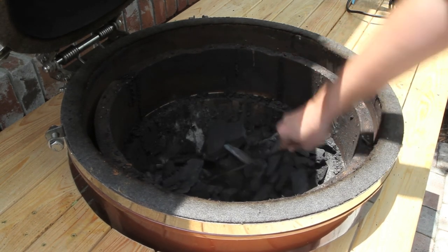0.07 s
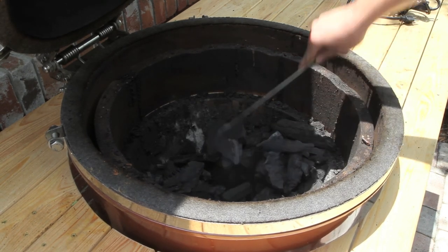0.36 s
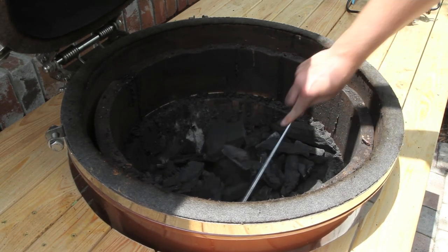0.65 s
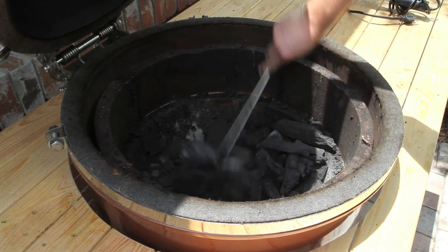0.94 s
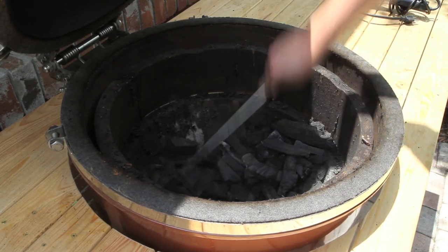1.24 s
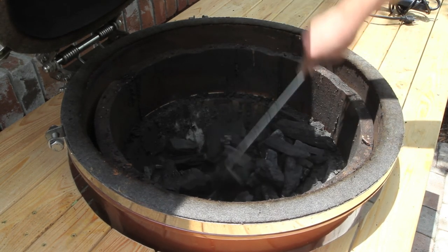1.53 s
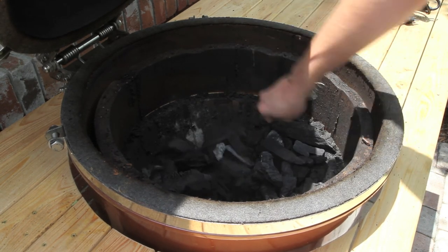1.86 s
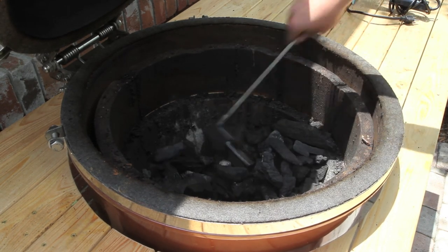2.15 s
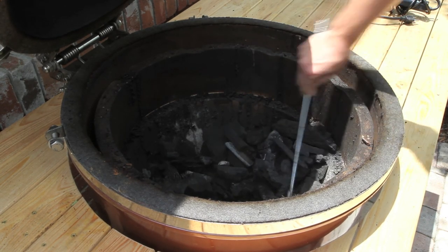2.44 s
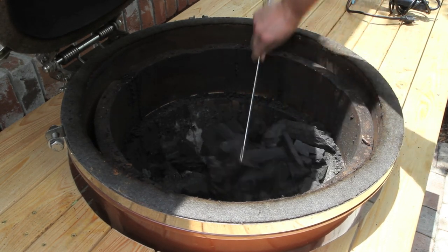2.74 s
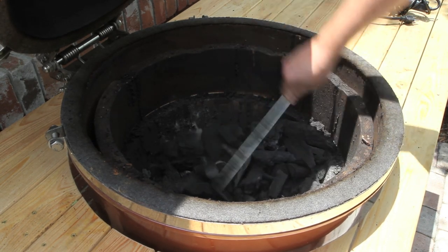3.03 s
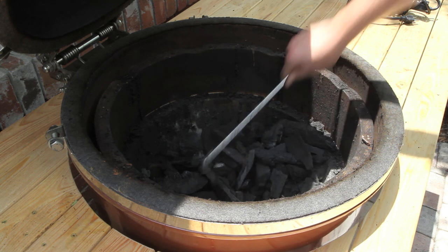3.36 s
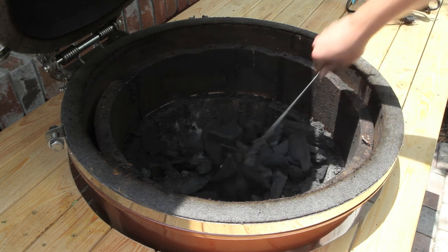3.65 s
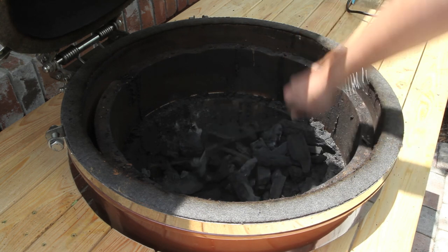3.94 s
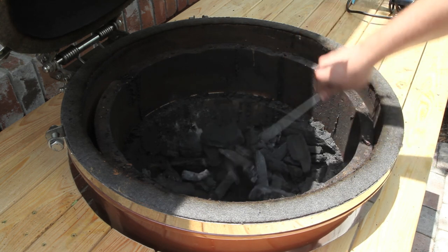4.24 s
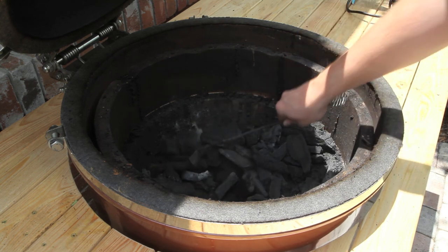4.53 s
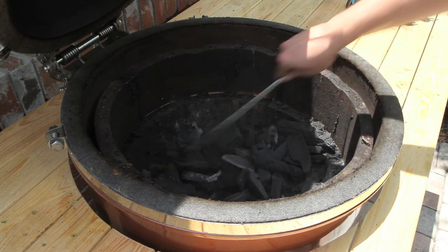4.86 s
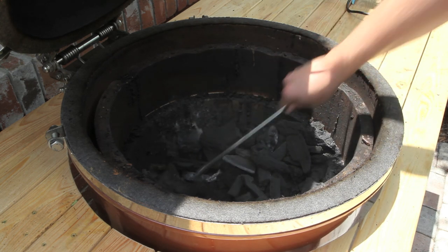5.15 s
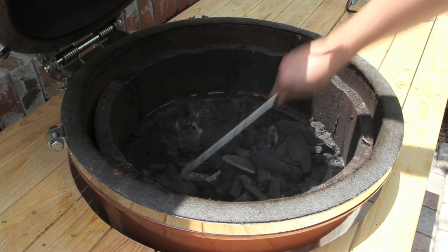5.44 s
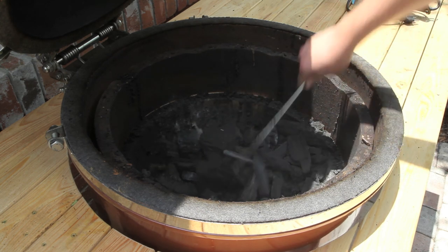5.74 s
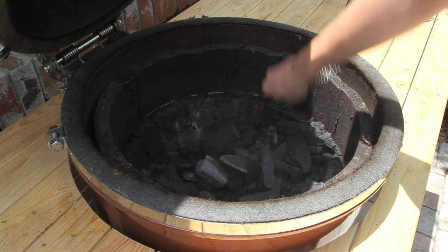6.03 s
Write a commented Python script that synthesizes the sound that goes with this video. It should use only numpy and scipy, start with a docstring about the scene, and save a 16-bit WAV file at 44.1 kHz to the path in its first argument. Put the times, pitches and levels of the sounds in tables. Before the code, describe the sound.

From the first instant a steel rake pushes through lump charcoal in an open ceramic grill, heard close in quiet outdoor air. Short, uneven strokes continue for about six seconds, each a rush of scraping grit with brittle lumps cracking, clinking and tumbling. The rake rings faintly and the hollow bowl booms softly underneath. At 0.6 seconds a cluster of heavier knocks hits the grate and leads into a longer scrape; more knocks come around 0.9, 1.8 and 2.4 seconds. Near 2.8 seconds one dense lump chatters against the blade with quick, bright ticks. The pushes and clinks go on with brief lulls. Around 4.8 seconds a soft, deep outdoor rumble swells, then fades beneath the last strokes. Two loud clacks stand out at about 5.5 and 6 seconds, followed by a final gritty scrape and a few clinks.

```python
"""A steel ash rake is pushed back and forth through lump charcoal in an open ceramic grill, outdoors.
From the first push the blade scrapes up a rush of grit, brittle lumps clink and tumble, the rake rings
faintly and the hollow bowl booms under it all. From 0.6 s on, a lump now and then knocks on the grate.
Near 2.8 s one dense lump chatters against the blade. Near 4.8 s a deep outdoor rumble swells, then
fades under the last pushes and two loud clacks."""
import sys
import numpy as np
from scipy import signal
from scipy.fft import rfft, irfft, next_fast_len
from scipy.io import wavfile
from scipy.ndimage import uniform_filter1d

SR = 44100
rng = np.random.default_rng(int(sys.argv[2]) if len(sys.argv) > 2 else 0)


def store_pcm(level_fs):
    """Save levels as 16-bit WAV."""
    pcm = np.round(np.clip(level_fs, -1, 1) * 32767).astype(np.int16)
    wavfile.write(sys.argv[1], SR, np.atleast_2d(pcm).T)


N = 277590
HIT_SAMPLES = 8192
AGE = np.arange(HIT_SAMPLES) / SR   # seconds since a hit


def from_db(db):
    """Turn decibels into a number to multiply by."""
    return 10 ** (np.asarray(db) / 20)


def unit_power(x):
    """Scale a sound to an average power of one."""
    return x / np.sqrt(np.mean(x ** 2) + 1e-20)


def unit_attack(x, attack_s=0.008):
    """Scale a hit so that its first moment has a power of one."""
    return x / np.sqrt(np.mean(x[:int(attack_s * SR)] ** 2) + 1e-20)


def steady(x, span_s):
    """Even out slow changes in loudness but keep the fine grain."""
    power = uniform_filter1d(x ** 2, max(int(span_s * SR), 2))
    return x / np.sqrt(np.maximum(power, 0) + 1e-12)


def add(track, start_s, sound):
    """Mix a sound into a track at the given time."""
    i = int(np.clip(start_s * SR, 0, N - 1))
    track[i:i + len(sound)] += sound[:N - i]


def fade(fade_s, size=HIT_SAMPLES):
    """Die away. Every fade time in this file is the time taken to drop by 60 dB."""
    return np.exp(-np.log(1000) * AGE[:size] / fade_s)


def noise(colour, size=HIT_SAMPLES):
    """A hiss whose colour says how strong each pitch is next to the others."""
    pitch_hz, level_db = np.transpose(colour)
    padded = next_fast_len(size, real=True)
    freq = np.maximum(np.fft.rfftfreq(padded, 1 / SR), 1)
    gain = from_db(np.interp(np.log(freq), np.log(pitch_hz), level_db))
    return unit_power(irfft(rfft(rng.standard_normal(padded)) * gain, padded)[:size])


def wander(turns_per_s):
    """A line that drifts up and down by chance, mostly between -1 and 1."""
    points = rng.standard_normal(N // 20)
    return np.interp(np.arange(N) / SR * turns_per_s, np.arange(len(points)), points)


def ring(force, notes):
    """An object that is hit or shaken rings at its own notes, each dying away."""
    out = 0
    for k, (pitch_hz, level_db, fade_s) in enumerate(notes):
        decay = np.exp(-np.log(1000) / (fade_s * SR))
        turn = 2 * np.pi * pitch_hz / SR
        note = signal.lfilter([0, np.sin(turn)], [1, -2 * decay * np.cos(turn), decay ** 2], force + 1e-18)
        out = out + (-1) ** k * from_db(level_db) * note
    return out


# colours of the open air and of its rumble: pitch_hz, level_db
AIR_COLOUR = [(70, -34), (130, 10.5), (250, -4), (1500, -9.5), (4000, -31)]
RUMBLE_COLOUR = [(25, -10), (60, -6), (160, -3), (400, -46)]
# how loud the rumble is as time passes: time_s, level_db
RUMBLE_LOUDNESS = [(0.7, -57), (1.3, -66), (4.3, -66), (4.8, -47.5), (5.4, -50), (6.29, -68)]


def outdoors(air_db=-47.5):
    """Quiet air and a deep rumble that comes and goes."""
    rumble_db = np.interp(np.arange(N) / SR, *np.transpose(RUMBLE_LOUDNESS))
    return from_db(air_db) * noise(AIR_COLOUR, N) + from_db(rumble_db) * noise(RUMBLE_COLOUR, N)


# low notes of the air in the bowl: pitch_hz, level_db, fade_s
BOWL_NOTES = [(132.4, 0, 0.18), (152.3, 2.5, 0.18), (231.3, -6, 0.12), (332.5, -7, 0.079)]


def bowl_boom(boom_db):
    """The shifting coals keep the air in the bowl booming."""
    return from_db(boom_db) * steady(ring(rng.standard_normal(N), BOWL_NOTES), span_s=0.095)


# high notes of the steel rake: pitch_hz, level_db, fade_s
RAKE_NOTES = [(1590, -8, 0.15), (2720, 8.5, 0.06), (4380, -9, 0.22), (5800, 7, 0.07), (6100, 2, 0.24),
              (6610, -17, 0.19), (13300, -3, 0.063)]


def rake_ring(coals, push_db, below_coals_db=22.0, muting=0.15):
    """The steel rings from all that touches it, and is muted while pushed hard into the coals."""
    pressing_db = np.maximum(push_db - np.percentile(push_db, 30), 0)
    ringing = from_db(-muting * pressing_db) * ring(coals, RAKE_NOTES)
    return from_db(-below_coals_db) * np.std(coals) * unit_power(ringing)


def lump_ring(pitch_hz, fade_s, size, overtone_db=-10.0, spread=0.5):
    """An uneven lump rings at one main note and four chance ones; higher notes die sooner."""
    ratios = np.append(1, np.exp(spread * rng.uniform(-0.272, 1, size=4)))
    gains = np.append(1, from_db(overtone_db) * rng.standard_normal(size=4))
    pitches = np.minimum(pitch_hz * ratios, SR / 2)[:, None]
    decays = fade(fade_s / np.sqrt(ratios[:, None]), size)
    return gains @ (np.sin(2 * np.pi * pitches * AGE[:size]) * decays)


def snap(colour, fade_s, echo_db, echo_s, rise_s=0.00084):
    """A snap builds as it bounces through the heap, then echoes between the ceramic walls."""
    rise = 1 - np.exp(-AGE / rise_s)
    return unit_attack(noise(colour) * rise * (fade(fade_s) + from_db(echo_db) * fade(echo_s)))


# colours of a lump's clack and of its brittle skin cracking: pitch_hz, level_db
CLACK_COLOUR = [(100, -26), (400, -1), (1300, 5.5), (3500, 1), (6000, -1), (9000, -13), (16000, -3.5)]
CRACK_COLOUR = [(1500, -20.5), (5000, 1), (10000, -0.5), (13300, 5.5), (16000, 1)]


def lump_hit(ring_db, pitch_hz, crack_db, snap_s, ring_s, tone_db, focus_db, tilt_db, overtone_db, spread):
    """One hit: a clack boosted near the lump's pitch, the lump's own ring, and the crack of its skin."""
    freq = np.geomspace(100, 16000, num=40)
    clack_hz, clack_db = np.transpose(CLACK_COLOUR)
    octaves = np.log2(freq / pitch_hz)
    colour_db = np.interp(np.log(freq), np.log(clack_hz), clack_db)
    colour_db += focus_db * np.exp(-(octaves / 0.7) ** 2)
    colour_db += tilt_db * np.maximum(octaves, 0)
    clack = snap(np.c_[freq, colour_db], snap_s, echo_db=-5.5, echo_s=0.087)
    deadened_db = 0.25 * max(crack_db + 38, 0)   # a lump that cracks louder than -38 dB rings less
    tone = unit_attack(lump_ring(pitch_hz, ring_s, HIT_SAMPLES, overtone_db, spread))
    body = unit_attack(clack + from_db(tone_db - deadened_db) * tone)
    crack = snap(CRACK_COLOUR, snap_s, echo_db=-15.0, echo_s=0.16)
    return from_db(ring_db) * body + from_db(crack_db) * crack


def tumble(level_db, centre_hz, fade_s, count, vary_db=4.0, spread=0.3, tick_db=-8):
    """Loose pieces roll off the blade; each lands with a dry tick and a short ring at its own pitch."""
    out = np.zeros(N)
    tick = from_db(tick_db) * unit_attack(noise(CLACK_COLOUR, size=2048) * fade(0.02, size=2048))
    landings = rng.random(count) * N
    sizes, pitches = np.clip(rng.standard_normal((2, count)), -2, 2)
    for landing, size, pitch in zip(landings, sizes, pitches):
        tone = unit_attack(lump_ring(centre_hz * np.exp(spread * pitch), fade_s, size=2048))
        add(out, landing / SR, from_db(level_db[int(landing)] + vary_db * size) * (tone + tick))
    return out


# one dense lump bouncing against the blade: start_s, level_db
CHATTER_TOUCHES = [(2.73, -26.5), (2.782, -25), (2.803, -42), (2.828, -26), (2.836, -21.5), (2.915, -31)]
# the notes of that lump: pitch_hz, level_db, fade_s
DENSE_LUMP_NOTES = [(4420, 1, .06), (5615, 3, 0.062), (6615, -7, 0.11)]


def chatter():
    """Each touch ticks and rings the same few notes of the dense lump, in a new balance."""
    out = np.zeros(N)
    for start_s, level_db in CHATTER_TOUCHES:
        notes = [(hz, db + 3 * rng.standard_normal(), fade_s) for hz, db, fade_s in DENSE_LUMP_NOTES]
        tone = unit_attack(ring(signal.unit_impulse(HIT_SAMPLES), notes))
        tick = from_db(-0.5) * unit_attack(noise(GRIT_COLOUR) * fade(0.046))
        add(out, start_s, from_db(level_db) * (tone + tick))
    return out


def crunch(length_s):
    """The skin of a lump gives way in a quick, growing burst of grit."""
    growth = np.linspace(0, 1, int(length_s * SR)) ** 2
    return from_db(2) * growth * noise(GRIT_COLOUR, size=len(growth))


# light hits of lump on lump or blade: start_s, ring_db, pitch_hz, crack_db
LIGHT_HITS = [(0.057, -19.5, 5920, -26), (0.365, -22, 4420, -23), (0.399, -24, 4020, -22),
              (0.564, -27, 3730, -20), (0.944, -16, 4340, -21), (0.984, -17.5, 4290, -17),
              (1.156, -27.5, 2790, -40), (1.229, -17, 5550, -12.5), (1.248, -19.5, 5130, -22),
              (1.327, -19.5, 4140, -18), (1.384, -27, 4630, -13), (1.724, -21.5, 5480, -13.5),
              (1.758, -28, 1400, -15), (1.819, -20, 2760, -11), (2.158, -23, 2750, -40),
              (2.261, -32, 5725, -23), (2.336, -28, 3040, -27.5), (2.864, -23.5, 5880, -16.5),
              (2.885, -17, 2920, -21), (2.994, -20.5, 4880, -16.5), (3.031, -18, 4720, -16),
              (3.1, -15, 3910, -23), (3.112, -16, 3140, -26), (3.398, -20.5, 6040, -10.5),
              (3.524, -32, 4460, -17), (3.584, -22, 3200, -19.5), (3.629, -16, 3400, -16.5),
              (3.835, -23, 4140, -26.5), (3.852, -24.5, 4010, -34), (3.905, -32, 6900, -20),
              (4.016, -20, 2630, -11), (4.1, -26, 7960, -26), (4.124, -22, 3430, -16.5),
              (4.227, -31.5, 3720, -34), (4.335, -29, 3770, -27), (4.457, -17, 2827, -20),
              (4.584, -12.5, 4300, -25), (4.614, -22.5, 3380, -21), (4.655, -20, 3870, -17),
              (4.767, -24.5, 3030, -24), (4.872, -28, 4900, -24), (4.903, -25.5, 3800, -25),
              (4.966, -25.5, 4830, -23.5), (5.087, -19.5, 5030, -16), (5.157, -25, 2590, -27),
              (5.2, -27, 1590, -34), (5.312, -32, 3340, -27), (5.664, -16.5, 5380, -16),
              (5.795, -26.5, 1570, -25), (5.961, -28, 4950, -24), (6.108, -19, 2810, -19),
              (6.128, -17, 4300, -27), (6.15, -15, 2720, -27)]


def clinks(grit_db, crunch_s=0.012):
    """Lumps strike each other and the blade; those being pushed crumble just before they crack."""
    out = np.zeros(N)
    for start_s, ring_db, pitch_hz, crack_db in LIGHT_HITS:
        crumble_s = start_s - crunch_s
        add(out, crumble_s, from_db(grit_db[max(int(crumble_s * SR), 0)]) * crunch(crunch_s))
        clink = lump_hit(ring_db, pitch_hz, crack_db, snap_s=0.023, ring_s=0.043, tone_db=3.0,
                         focus_db=10.0, tilt_db=1.5, overtone_db=-7, spread=1.0)
        add(out, start_s, clink)
    return out


# heavy hits that reach the grate: start_s, ring_db, pitch_hz, crack_db, thud_db
HEAVY_HITS = [(0.604, -12.5, 1567, -38, -24), (0.613, -15, 2140, -38, -19.5), (0.638, -18, 1430, -17, -34),
              (0.674, -21.5, 1475, -32, -55), (0.921, -15.5, 1400, -12.5, -29.5),
              (1.741, -18, 3920, -16, -54), (1.837, -18, 1335, -15.5, -44), (2.382, -14.5, 2266, -30, -19),
              (2.392, -18, 1875, -17, -23.5), (2.994, -22, 1020, -40, -38), (3.008, -26, 1130, -32, -42),
              (3.049, -23.5, 1290, -40, -50), (3.918, -27, 5100, -15, -31), (4.437, -20, 5280, -20.5, -29),
              (5.063, -20.5, 3880, -17, -38), (5.077, -20.5, 950, -23, -38), (5.11, -27, 5200, -19, -33),
              (5.504, -24.5, 2500, -27, -34), (5.516, -11, 3000, -18.5, -23.5),
              (5.983, -8, 1508, -14.5, -42), (6.176, -20, 1620, -41, -46)]
# notes of the grate and fire box: pitch_hz, level_db, fade_s
GRATE_NOTES = [(231.5, -0.5, 0.078), (329.5, 3, 0.086), (490, 2, 0.047)]


def knocks():
    """Heavy hits clack with a bunch of close notes and set the grate and fire box thudding."""
    out = np.zeros(N)
    for start_s, ring_db, pitch_hz, crack_db, thud_db in HEAVY_HITS:
        clack = lump_hit(ring_db, pitch_hz, crack_db, snap_s=0.034, ring_s=0.068, tone_db=0.5,
                         focus_db=3.0, tilt_db=-1.0, overtone_db=-0.5, spread=0.35)
        blow = fade(0.0045)
        rattle = 0.066 * rng.standard_normal(HIT_SAMPLES) * fade(0.053)
        thud = from_db(thud_db) * unit_attack(ring(blow + rattle, GRATE_NOTES))
        add(out, start_s, clack + thud)
    return out


def tiny_breaks(colour, per_s, vary_db, snap_s, catch_db, places=5):
    """Countless tiny breaks, louder and softer as the blade catches and slips."""
    breaking = rng.random(N) < per_s / SR
    level_db = vary_db * np.minimum(rng.exponential(1, N), 4) + catch_db * wander(110)
    cracks = breaking * from_db(level_db) * rng.choice([-1, 1], N)
    place = rng.integers(0, places, N)
    out = np.zeros(N)
    for k in range(places):   # each place in the bowl echoes in its own way
        sound = snap(colour, snap_s, echo_db=-17.5, echo_s=0.075)
        out += signal.oaconvolve(cracks * (place == k), sound)[:N]
    return steady(out, span_s=0.1)


# colours of sliding grit and of lumps grinding together: pitch_hz, level_db
GRIT_COLOUR = [(900, -11), (2000, -10), (3000, -1.5), (5400, -2), (7500, -5), (10000, -6.5), (13500, 1.5),
               (16000, -8)]
GRIND_COLOUR = [(80, -53), (170, -7.5), (350, -3), (600, -0.5), (900, -7), (1500, 5), (2100, -6),
                (3000, -11), (6000, -15.5)]


def scrape(grit_db, grind_db):
    """The blade drags through the heap: fine grit hisses, big lumps grind and brittle skins crackle."""
    grit = tiny_breaks(GRIT_COLOUR, per_s=2000, vary_db=3.5, snap_s=0.011, catch_db=2.0)
    grind = tiny_breaks(GRIND_COLOUR, per_s=450, vary_db=3.5, snap_s=0.052, catch_db=3.0)
    crackle = tiny_breaks(CRACK_COLOUR, per_s=90, vary_db=4.5, snap_s=0.0062, catch_db=1.5)
    return from_db(grit_db - 1) * grit + from_db(grind_db - 1) * grind + from_db(grit_db - 9) * crackle


BITE_S, STEP_SAMPLES = 0.00068, 20   # time for the blade to take hold; spacing of the loudness points


def shove(start_s, swell_s, hold_s, fade_s, swell_db=16.5, trickle_db=-6.5, settle_s=0.9):
    """Strength of one movement of the heap: it bites, swells, holds, stops and trickles out."""
    age = np.maximum(np.arange(0, N, STEP_SAMPLES) / SR - start_s, 0)
    bite = 1 - np.exp(-age / BITE_S)
    swell = from_db(-swell_db * np.maximum(1 - age / swell_s, 0))   # coals pile up ahead of the blade
    stopped_s = np.maximum(age - swell_s - hold_s, 0)
    stop = from_db(-60 * stopped_s / fade_s)
    trickle = from_db(trickle_db - 60 * stopped_s / settle_s)
    return bite * swell * np.maximum(stop, trickle)


# pushes of the blade into the heap: start_s, swell_s, hold_s, grit_db, grind_db, boom_db
RAKE_PUSHES = [(0.0, 0.00062, 0.049, -21.5, -30, -29.5), (0.055, .02, 0.423, -28.5, -38, -42.5),
               (0.594, 0.056, 0.03, -19.5, -26.5, -28), (0.667, 0.17, 0.09, -17.5, -30, -32.5),
               (1.068, 0.0092, 0.019, -22.5, -27.5, -34), (1.206, 0.025, 0.016, -25, -26, -35.5),
               (1.274, 0.029, 0.1, -23.5, -35, -36), (1.434, 0.032, 0.029, -27, -42, -43),
               (1.531, 0.019, 0.16, -35.5, -45.5, -55), (1.722, 0.012, 0.046, -24, -28, -38),
               (1.791, 0.032, 0.0086, -19.5, -30, -30.5), (1.86, 0.038, 0.13, -26.5, -36.5, -58),
               (2.005, 0.16, 0.084, -27, -42, -42), (2.464, 0.17, .12, -18, -30, -35),
               (2.989, 0.01, 0.034, -17.5, -27.5, -34), (3.061, 0.026, 0.033, -21.5, -38, -35.5),
               (3.142, 0.018, 0.22, -38, -57, -55), (3.397, 0.0058, 0.014, -22.5, -48, -44),
               (3.482, 0.027, 0.1, -26, -44.5, -43.5), (3.89, 0.018, 0.13, -23.5, -30.5, -36.5),
               (4.036, 0.027, 0.085, -25, -35, -41), (4.26, 0.027, 0.16, -40.5, -55, -57),
               (4.493, 0.024, 0.06, -18, -29, -35), (4.607, 0.021, 0.056, -20.5, -25, -40),
               (4.71, 0.036, .11, -30.5, -42, -39.5), (4.959, 0.0049, 0.073, -29.5, -35, -41.5),
               (5.05, 0.029, 0.048, -24, -27, -25.5), (5.138, 0.037, 0.039, -28.5, -32, -31),
               (5.594, 0.034, 0.088, -23.5, -34, -36), (5.99, 0.015, 0.025, -28, -37, -42),
               (6.047, 0.033, 0.12, -21, -30, -38), (6.188, 0.03, 0.063, -24.5, -36, -33)]


def raking(jolt_hold_s=0.019):
    """Pushes and heavy hits stir the heap; the strongest sets the grit, grind and boom levels in dB."""
    jolts = [(start_s, BITE_S, jolt_hold_s, thud_db - 5, thud_db - 6, thud_db - 9.5)
             for start_s, *_, thud_db in HEAVY_HITS]
    gains = 1e-6
    for start_s, swell_s, hold_s, grit_db, grind_db, boom_db in RAKE_PUSHES + jolts:
        slide = shove(start_s, swell_s, hold_s, fade_s=0.064)
        boom = shove(start_s, swell_s, hold_s, fade_s=0.3)
        movement = [from_db(grit_db) * slide, from_db(grind_db) * slide, from_db(boom_db) * boom]
        gains = np.maximum(gains, movement)
    return [np.interp(np.arange(N), np.arange(0, N, STEP_SAMPLES), 20 * np.log10(gain)) for gain in gains]


def scene():
    """Grit, lumps, rake and bowl over quiet outdoor air."""
    grit_db, grind_db, boom_db = raking()
    scraping = scrape(grit_db, grind_db)
    chips = tumble(grit_db - 9, centre_hz=5000, fade_s=0.06, count=600, spread=0.34, tick_db=-12)
    splinters = tumble(grit_db - 8, centre_hz=12700, fade_s=0.024, count=600,
                       vary_db=3, spread=0.12, tick_db=-12.5)
    chunks = tumble(grind_db - 6, centre_hz=1400, fade_s=0.098, count=170)
    coals = scraping + splinters + chips + chunks + clinks(grit_db) + knocks() + chatter()
    return (coals + rake_ring(coals, grit_db) + bowl_boom(boom_db) + outdoors())[None]


def record(dry, low_cut_hz=55, high_cut_hz=15900):
    """The microphone drops the deep bass, the hardest peaks are rounded and the top treble is cut."""
    thin = signal.sosfilt(signal.butter(3, low_cut_hz, "high", fs=SR, output="sos"), dry)
    return signal.sosfilt(signal.ellip(12, 0.1, 90, high_cut_hz, fs=SR, output="sos"), np.tanh(thin))


dry = scene()
out = record(dry)
store_pcm(out)
```